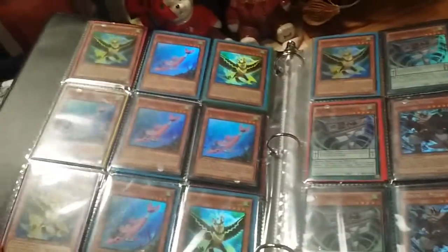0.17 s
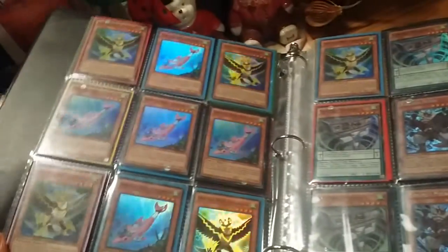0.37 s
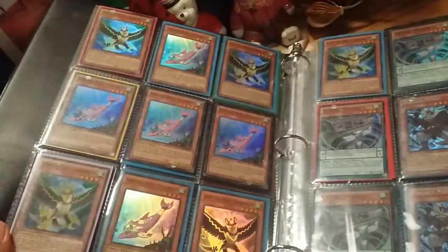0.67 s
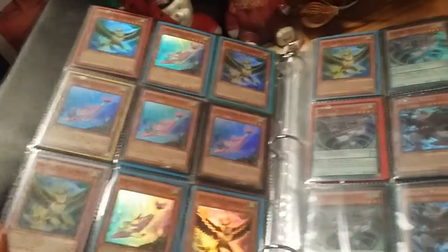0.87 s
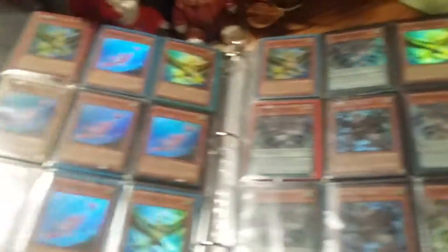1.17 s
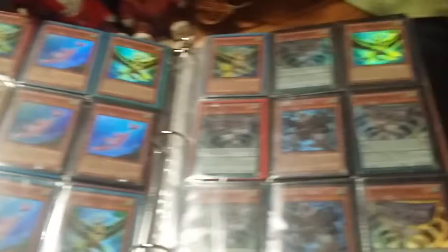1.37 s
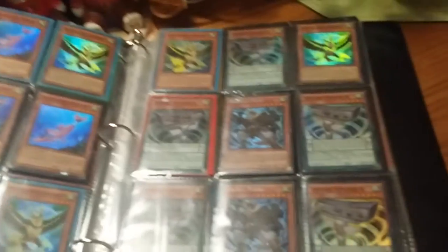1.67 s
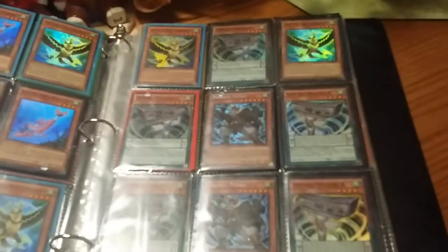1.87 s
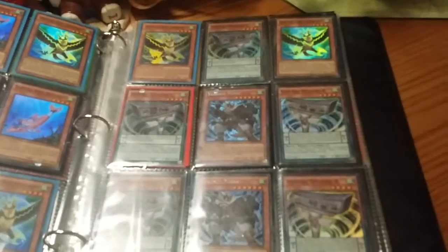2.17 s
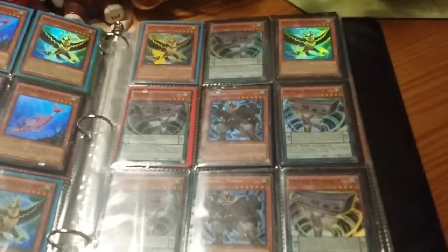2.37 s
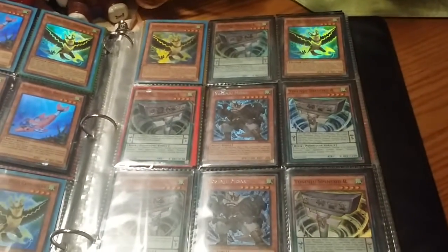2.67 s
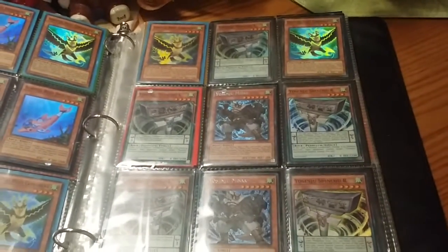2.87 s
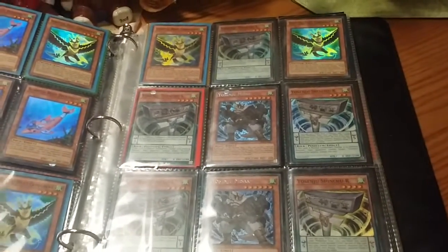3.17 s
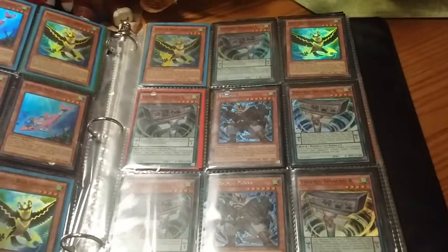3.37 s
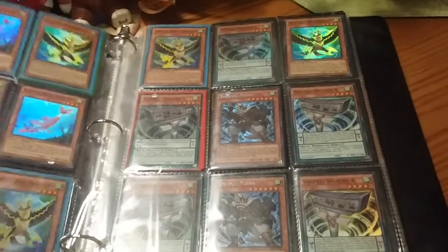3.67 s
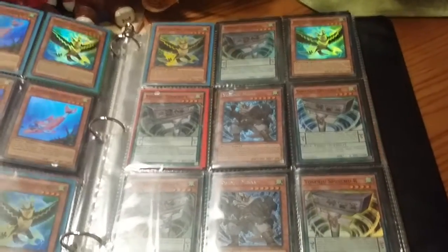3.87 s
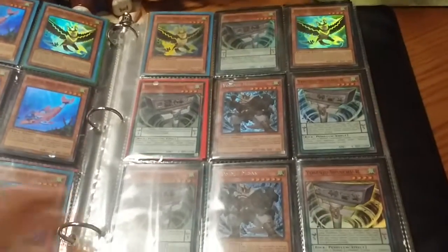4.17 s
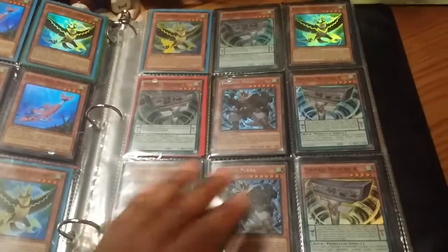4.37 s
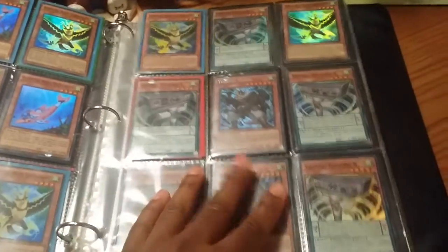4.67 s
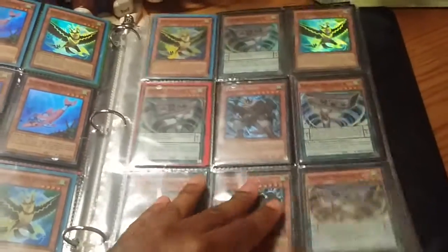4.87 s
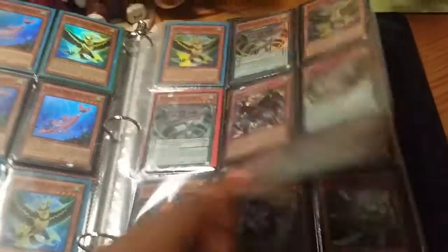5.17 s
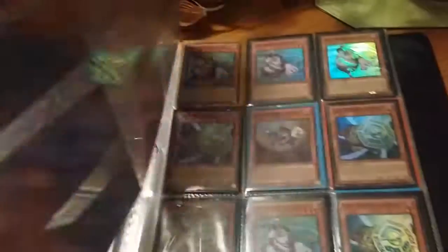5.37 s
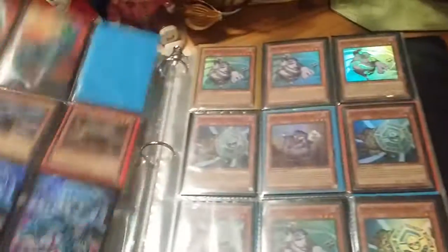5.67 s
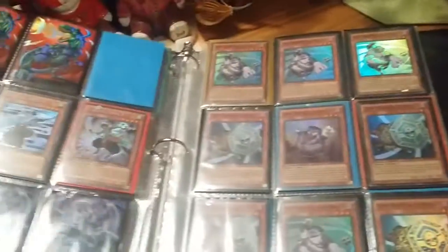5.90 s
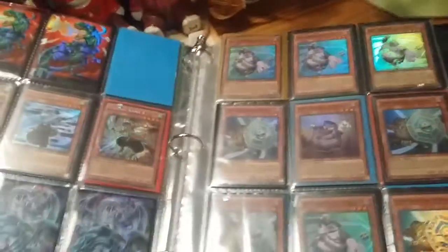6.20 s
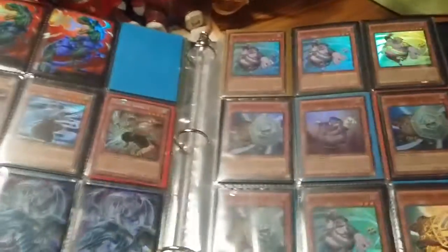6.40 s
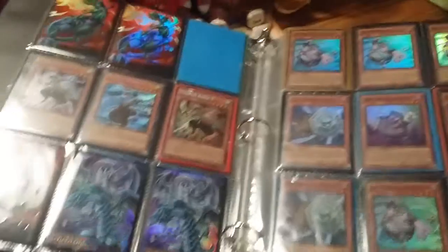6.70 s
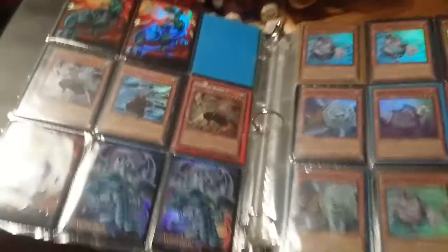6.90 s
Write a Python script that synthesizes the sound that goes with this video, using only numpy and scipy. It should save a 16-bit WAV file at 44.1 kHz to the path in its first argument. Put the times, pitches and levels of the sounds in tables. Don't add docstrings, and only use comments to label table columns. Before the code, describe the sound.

Close to a small microphone in a small, fairly dry room, a low motor hum and soft rushing air run throughout. Plastic pockets of sleeved cards rustle faintly, with dull creaks and soft thuds. Midway come sharper snaps and a ring knock; then the page is pressed, cracks crisply, and turns in a burst of rustle, ticks and low knocks before settling.

```python
import sys
import numpy as np
from scipy import signal
from scipy.fft import rfft, irfft, next_fast_len
from scipy.io import wavfile
from scipy.ndimage import uniform_filter1d, map_coordinates

SR = 44100
rng = np.random.default_rng(int(sys.argv[2]) if len(sys.argv) > 2 else 0)


def magnitude_from_level(level_db):
    exponent = np.asarray(level_db, float) / 20
    return 10 ** exponent


def wav_record(signal):
    frames = np.transpose(np.atleast_2d(signal))
    bounded = np.clip(frames, -1, 1)
    quanta = np.round(bounded * 32767).astype(np.int16)
    wavfile.write(sys.argv[1], SR, quanta)


N = 310464

# (frequency [Hz], level [dB rms])
MOTOR_PAIR = [(58.21, -55.5), (61.76, -57.6)]
HUM_HZ = [119.98, 239.97, 359.94, 479.93, 269.09, 226.89, 210.83, 450.8, 117.19, 389.09, 468.75, 327.36,
          244.93, 53.64]
HUM_DB = [-51, -56, -57, -61.3, -43.1, -54.3, -63, -61.4, -66.4, -68.8, -67.7, -69.7, -67.6, -71]
HUM_SHAKE_DB = [1.2, 1, 1.8, 1.5, .2] + 9 * [1]
HUM_SWAY_DB = [0, 0, 3.5] + 11 * [0]
# (frequency [Hz], level [dB per Hz])
AIR_COLOUR = [(24, -48), (40, -15.5), (55, -7), (81, -13.5), (124, -7.5), (177, -10.5), (245, -8.5),
              (268, -5.5), (294, -11.5), (317, -8), (371, -11), (412, -14.5), (457, -14), (521, -19),
              (593, -18.5), (900, -22), (1170, -64), (1980, -120)]
# (frequency [Hz], level [dB per Hz])
HISS_COLOUR = [(350, -4), (600, 2), (828, -13.5), (862, -15), (934, -3), (1600, -7.5), (1750, -6.5),
               (2120, -14), (3570, -21.5), (5270, -32.5), (13300, -14), (14800, -18.5)]
# (frequency [Hz], time to fall 60 dB [s])
ROOM_DECAY = [(300, 0.24), (2000, 0.084), (10000, 0.091)]

# (time [s], peak level [dB])
RING_KNOCK = [
    (3.7157, -15.8),
]
# (frequency [Hz], level [dB], time to fall 60 dB [s])
COVER_TONES = [(460, -20, 0.11), (477, -9, 0.11), (640, 10.5, 0.034), (600, -4, 0.032), (705, 4.5, 0.032),
               (825, -14, 0.1), (780, 14, 0.0071), (1030, 8, 0.02), (1650, -6, 0.05), (2260, -2.5, 0.023),
               (3515, -25, .02)]
# (time [s], peak level [dB], frequency [Hz], time to fall 60 dB [s])
TABLE_THUDS = [
    (1.301, -31, 62, 0.2),
    (1.3, -26, 255, 0.2),
    (1.819, -32, 56.5, 0.14),
    (3.718, -33, 211, 0.17),
    (5.848, -20.5, 64.6, 0.092),
    (6.328, -31, 122, 0.14),
]

# (peak time [s], level [dB], held [s], stack resonance [Hz])
BENDS = [(0.0, -68, 0.017, 1310), (.12, -61, 0.073, 1330), (.35, -57, 0.18, 1290), (.57, -71, .01, 1290),
         (.68, -64.5, 0.13, 1330), (1.08, -57, .005, 1760), (1.21, -55.5, 0.01, 1230),
         (1.29, -54, 0.049, 1450), (1.56, -58, 0.11, 1410), (1.8, -54.5, 0.1, 1160),
         (2.25, -51.5, 0.052, 1340), (2.34, -64, 0.028, 1360), (2.57, -61, .01, 1310),
         (2.8, -59, 0.086, 1370), (3.6, -67, .06, 1310), (3.75, -52, 0.004, 1120), (3.96, -64, 0.15, 1650),
         (4.22, -65, .005, 1780), (4.45, -58.5, 0.011, 1430), (4.74, -61.5, 0.098, 1770),
         (4.96, -62, 0.11, 1210), (5.23, -55, .005, 1600), (5.33, -57, 0.16, 1610), (5.62, -62, .04, 1240),
         (5.71, -52, .01, 1290), (5.97, -59.5, 0.036, 1320), (6.35, -54.5, .005, 1020),
         (6.5, -60, 0.095, 1460), (6.92, -68, .01, 1130), (7.03, -60, .01, 1030)]
# (peak time [s], crinkle level [dB], held [s], slide level over crinkle [dB])
DRAGS = [(.36, -69, 0.025, 7), (.44, -68, 0.018, -5), (1.05, -59, 0.027, 1), (1.3, -73, 0.11, 8),
         (3.65, -57.5, .015, 1.5), (4.45, -62, 0.014, 1), (4.85, -53, 0.0044, 1.5),
         (5.23, -56.5, 0.039, -4), (5.35, -65, 0.044, 5), (5.64, -56.5, 0.055, -0.5), (5.71, -55, .01, 4),
         (5.8, -58.5, 0.15, 1), (5.98, -58.5, 0.14, -5), (6.44, -58.5, 0.047, -10), (2.82, -61, .02, -3),
         (4.02, -62, .02, 0)]
# (frequency [Hz], level [dB per Hz])
CRINKLE_COLOUR = [(1500, 1.5), (2600, 1), (4000, 0.5), (6000, -4), (8000, -8.5), (11000, -12.5)]
# (frequency [Hz], level [dB per Hz])
SLIDE_COLOUR = [(5000, -53), (8000, -4), (10500, -1), (13000, 0), (15500, -4.5)]

# (time [s], peak level [dB], frequency [Hz], held [s], width [parts of frequency])
CREAKS = [(0.167, -37.5, 605, 0.032, 1.7), (0.285, -42, 1900, 0.03, 0.29), (1.046, -39, 2000, 0.018, 0.47),
          (1.3035, -33, 610, 0.01, 0.5), (1.8, -34, 603, 0.015, 0.83), (2.254, -30.5, 940, 0.018, 0.4),
          (2.329, -36.5, 1220, 0.041, 0.76), (2.541, -43, 1240, 0.025, 0.59),
          (3.536, -40, 1300, 0.012, 1.1), (3.661, -32, 600, 0.0079, 0.38), (3.946, -28, 1710, 0.021, 0.42),
          (4.17, -38.5, 1850, 0.03, 0.44), (4.864, -35, 4170, 0.0057, 0.091),
          (0.388, -44, 4050, 0.033, 0.54), (1.955, -44, 850, 0.038, 0.16), (4.704, -37.5, 735, 0.0095, 1.3),
          (5.214, -38, 617, 0.062, 1.6), (5.663, -41, 705, 0.02, 0.52), (5.686, -32, 615, 0.0071, 0.64),
          (5.693, -43, 1400, 0.028, 0.7)]
# (time [s], peak level [dB], frequency [Hz])
PAGE_THUMPS = [
    (5.401, -34, 630),
    (5.428, -32, 690),
    (5.495, -30.5, 785),
    (5.575, -42, 595),
]
# (time [s], peak level [dB], frequency [Hz], held [s])
RUBS = [(0.167, -50, 1370, 0.015), (1.288, -42.5, 1600, 0.042), (1.334, -45, 1470, 0.051),
        (1.89, -41.5, 1570, 0.04), (2.239, -37, 1560, 0.025), (2.58, -43, 1390, 0.042),
        (2.809, -48.5, 1900, 0.028), (3.607, -43, 1650, 0.022), (3.8035, -41.5, 1820, 0.015),
        (3.9819, -37.5, 1650, 0.044), (4.855, -42, 2400, 0.015), (2.25, -47, 2470, 0.039),
        (5.214, -39, 1880, 0.014), (5.4191, -43, 2050, 0.016), (5.491, -50, 2030, 0.009)]
# (time [s], peak level [dB], frequency [Hz], held [s])
SCUFFS = [(0.385, -49, 2590, 0.029), (1.044, -44.5, 3180, 0.035), (3.66, -40, 3400, 0.006),
          (4.7775, -41, 4360, 0.027), (4.805, -46, 3020, 0.039), (4.846, -38, 3090, 0.013),
          (5.418, -40, 6200, 0.012), (5.2246, -46, 3710, 0.017), (5.4144, -49, 2830, 0.02),
          (6.913, -52, 3100, 0.027)]
# (time [s], peak level [dB], frequency [Hz], held [s])
SWISHES = [(3.5095, -56, 12800, 0.03), (3.763, -35, 12900, 0.011), (4.7905, -38, 13000, 0.013),
           (5.2114, -40, 11900, 0.013), (5.409, -45, 12900, 0.043), (5.6366, -44, 14000, 0.03),
           (5.745, -36, 13800, 0.045), (5.76, -43, 10000, 0.031), (5.83, -46, 13400, 0.05),
           (5.9, -38.5, 13100, 0.026), (5.95, -45, 13300, 0.033), (5.71, -45, 13600, 0.03),
           (6.0551, -48, 11500, 0.031)]

# (centre time [s], peak
# level [dB], frequency [Hz], length [cycles])
POPS = [(4.7753, -40, 1900, 4), (4.7829, -42, 4500, 8), (4.7911, -41, 4600, 6), (4.8534, -35, 2000, 2),
        (4.8677, -41, 2100, 5), (4.8694, -43, 4200, 16), (4.873, -41, 4400, 14), (4.8737, -44, 2200, 5),
        (4.8775, -34, 2200, 6), (4.8799, -29.5, 2030, 4.3), (4.8733, -46, 12800, 14),
        (4.8892, -46, 2300, 5), (5.2056, -41, 900, 2.2), (5.2111, -41, 2000, 4), (5.2305, -44, 2000, 4),
        (5.6846, -36, 700, 2), (5.6908, -33, 1300, 1.8), (5.6976, -43, 12500, 14), (5.7085, -37, 1050, 4),
        (5.7146, -34, 1600, 2.3), (5.7147, -32, 3900, 4.6), (5.7187, -45, 3700, 4), (5.7198, -41, 1050, 3),
        (5.725, -39, 1500, 4), (5.7285, -39, 1200, 3), (3.6622, -33, 900, 2.5), (3.7238, -39, 1400, 3),
        (3.7268, -36, 1200, 3), (3.7295, -32, 750, 4), (3.7662, -33, 1700, 2.5), (3.7734, -43, 2000, 4),
        (3.7777, -41, 600, 2), (3.719, -43, 3300, 2.5), (3.9495, -39, 1750, 6), (4.015, -43, 1500, 6),
        (4.035, -47, 2200, 8), (4.176, -44, 2000, 8), (4.19, -48, 1700, 7), (4.215, -48, 2100, 9),
        (4.234, -47, 1500, 5), (1.303, -43, 1550, 9), (1.329, -45, 1650, 12), (1.312, -39, 260, 2.5),
        (1.345, -37, 270, 2.5),
        (.3972, -55, 7000, 9), (.4034, -55, 7000, 9), (.4107, -50, 4200, 9), (1.0446, -50, 3600, 7),
          (1.0461, -54, 7000, 8), (1.0488, -46, 1900, 6), (1.0621, -45, 2500, 4), (1.0708, -50, 3800, 7),
          (1.0735, -55, 7000, 9), (1.0861, -48, 1800, 5), (3.5371, -51, 7000, 7), (3.5498, -47, 1900, 5),
          (3.6505, -49, 7500, 6), (3.6506, -45, 1800, 3), (3.6617, -34, 9200, 6), (3.6717, -45, 12800, 12),
          (3.7465, -36, 7400, 5), (3.7466, -41, 2000, 3), (3.7569, -48, 3500, 5), (3.7597, -50, 9500, 9),
          (3.7708, -48, 3600, 5), (4.775, -49, 9500, 4), (4.7834, -50, 9700, 9), (4.791, -44, 7300, 7),
          (4.8059, -47, 10300, 12), (4.8465, -45, 4300, 7), (4.8497, -42, 7000, 8), (4.8504, -46, 9300, 9),
          (4.8581, -52, 7000, 8), (4.8616, -49, 7000, 8), (4.8618, -43, 2300, 6), (4.8676, -50, 9800, 9),
          (4.8796, -31, 10200, 11), (4.8803, -40, 13400, 14), (4.8813, -39, 3900, 5), (5.23, -48, 3500, 5),
          (5.4254, -45, 2000, 5), (5.4622, -44, 2800, 2), (5.4655, -42, 1700, 4), (5.4957, -35, 1900, 4),
          (5.4982, -40, 2000, 4), (5.5007, -42, 1900, 4), (5.5755, -44, 1900, 5), (3.5366, -43, 1600, 3),
          (5.5074, -47, 1500, 3), (5.6907, -33, 9000, 6), (5.6955, -49, 9500, 9), (5.7024, -47, 12500, 12)]
# (time [s], crack peak [dB], top edge [dB], ring level [dB], ring frequency [Hz])
SNAPS = [(1.0444, -59, -11, 16, 2050), (1.624, -44, -2, 2, 848), (2.8204, -45, -12, 2, 969),
         (3.51, -50, -1, 8, 1420), (3.526, -47, -11, 12, 2000), (3.5353, -40.5, -12, 4, 1290),
         (3.5515, -47, -7, 4, 1690), (3.649, -37, -22, -7, 1160), (3.6605, -33, -8, 1, 940),
         (3.7652, -30, -7, -10, 1900), (3.8943, -52, -8, -2, 1200), (4.0238, -47, -6, 6, 1270),
         (4.8762, -46, -25, 6, 2130), (4.878, -35, -6, -14, 2040), (5.205, -42, -4, -3, 1980),
         (5.2297, -40, -15, -4, 1460), (5.4605, -45, -22, 8, 1680), (5.4941, -55, -20, 20.5, 2020),
         (5.5765, -57, -12, 10, 1930), (5.683, -42, 0, 3, 920), (5.7132, -32, -17, -6, 1290),
         (6.9121, -37.5, -5.5, -0.5, 1050)]
# (time [s], peak level [dB], top edge [dB])
CRACKS = [(0.6478, -48, -6), (3.7452, -37, -2), (4.4357, -50, -8), (4.7796, -49, -4), (4.79, -44, -4),
          (4.8515, -34, -14), (5.209, -42, -20), (5.6894, -28, -12), (5.989, -50, -2)]
# (time [s], peak level [dB], frequency [Hz])
TICKS = [(4.775, -40, 1900), (4.7824, -36, 4200), (4.79, -37, 4300), (4.791, -40, 13300),
         (4.805, -38, 10800), (4.8105, -38, 7300), (4.815, -45, 4000), (4.8355, -40, 6800),
         (4.845, -35, 4300), (4.8527, -34, 2300), (4.862, -37, 2600), (4.8786, -30, 10400),
         (5.2062, -29, 2060), (5.2064, -38, 12800), (5.2112, -36, 2100), (5.2155, -42, 12500),
         (5.2315, -45, 12000), (5.2355, -42, 3600), (5.42, -33, 2060), (5.4225, -41, 3700),
         (5.4255, -46, 6300), (5.4255, -43, 13000), (5.432, -46, 6800), (5.4663, -39, 1800),
         (5.496, -42, 1900), (5.499, -44, 2000), (5.518, -41, 1900), (5.6368, -43, 3040),
         (5.6908, -37, 1640), (5.709, -29, 1300), (5.722, -38, 1500), (5.73, -38, 1300),
         (5.762, -39, 13000), (5.935, -40, 1670), (3.662, -33, 3500), (3.746, -35, 2000),
         (3.7493, -27, 1900), (1.3065, -36, 696), (3.536, -44, 1500), (3.951, -38, 1700),
         (3.6505, -40, 2480), (4.8, -43, 3500), (4.824, -47, 3000), (4.857, -41, 3200), (4.867, -41, 2400),
         (5.211, -39, 4000), (5.5845, -41, 2000), (5.6925, -38, 3970), (5.7147, -36, 4500),
         (5.933, -41, 12500), (5.8045, -41, 13500), (4.8785, -36, 13500)]

# (frequency [Hz], threshold over usual level [dB])
MUTE_THRESHOLD = [(3500, -32), (5500, -8), (7300, -1.5), (8800, -6.5), (11000, -29), (14500, -16)]


def unit(x):
    return x / np.sqrt(np.mean(x ** 2) + 1e-20)


def along(points, hz):
    f, v = np.transpose(points)
    return np.interp(np.log(hz + 1), np.log(f + 1), v)


def wobble(rate):
    knots = rng.standard_normal(int(N * rate / SR) + 4)
    return map_coordinates(knots, [np.arange(N) * rate / SR])


def coloured(x, spectrum):
    m = next_fast_len(len(x) + 8192)
    gain = magnitude_from_level(along(spectrum, np.fft.rfftfreq(m, 1 / SR)))
    return unit(irfft(rfft(x, m) * gain, m)[:len(x)])


def grains(clump_db, spike_db):
    strength = magnitude_from_level(clump_db * wobble(60) + spike_db * wobble(900))
    return unit(strength * rng.standard_normal(N))


def strokes(s, db, held, rise, fall):
    late = np.arange(0, N + 64, 64) / SR - s[:, None]
    rising_db = rise * np.minimum(late, 0)
    falling_db = fall * np.maximum(late - held[:, None], 0)
    each_db = db[:, None] + rising_db - falling_db
    return np.repeat(np.sqrt(np.sum(magnitude_from_level(2 * each_db), axis=0)), 64)[:N]


def resonate(x, hz, width):
    b, a = signal.iirpeak(hz, 1 / np.clip(width, .05, 3), SR)
    return signal.lfilter(b, a, signal.lfilter(b, a, x))


def band_burst(t, hz, width, t60, rise, held=0):
    steps = np.repeat(rng.standard_normal(len(t) // 60 + 1), 60)[:len(t)]
    grit = magnitude_from_level(2.4 * steps) * rng.standard_normal(len(t))
    noise = unit(resonate(grit, hz, width))
    fade = magnitude_from_level(-60 * np.maximum(t - held, 0) / t60)
    return .5 * noise * fade * (1 - np.exp(-t / rise))


def struck(t, hz, width, scatter_s):
    push = magnitude_from_level(-60 * t / scatter_s) * rng.standard_normal(len(t)) * 0.4
    push[0] = 1
    ring = resonate(push, hz, width)
    return ring / np.abs(ring).max()


def add(track, s, sound):
    track[round(s * SR):][:len(sound)] += sound


def hum():
    t = np.arange(N) / SR
    sway = np.cos(2 * np.pi * 1 * (t - .15))
    tones = np.zeros(N)
    for hz, db, shake_db, sway_db in zip(HUM_HZ, HUM_DB, HUM_SHAKE_DB, HUM_SWAY_DB):
        level = magnitude_from_level(db + shake_db * wobble(3.73) + sway_db * sway)
        tones += level * np.sin(2 * np.pi * (hz * t + rng.random()))
    pair = np.zeros(N)
    null_s = 1.682
    for k, (hz, db) in enumerate(MOTOR_PAIR):
        rocking = (1 - k) * .6 * sway
        pair += (-1) ** k * magnitude_from_level(db) * np.sin(2 * np.pi * hz * (t - null_s) + rocking)
    air = magnitude_from_level(-49.5 + .7 * wobble(3)) * coloured(rng.standard_normal(N), AIR_COLOUR)
    hiss = magnitude_from_level(-56.0 + 0.12 * wobble(2.1)) * coloured(rng.standard_normal(N), HISS_COLOUR)
    return np.sqrt(2) * (tones * (1 + .11 * sway) + pair) + air + hiss


def room(x):
    hz, t, z = signal.stft(rng.standard_normal(SR // 2), SR, nperseg=256)
    fade = magnitude_from_level(-60 * t / along(ROOM_DECAY, hz)[:, None])
    tail = signal.istft(z * fade, SR, nperseg=256)[1]
    return signal.fftconvolve(np.pad(x, (200, 0)), tail / np.linalg.norm(tail))[:N]


def knocks():
    out, t = np.zeros(N + SR), np.arange(SR // 2) / SR
    for s, db in RING_KNOCK:
        ring = np.zeros(len(t))
        for hz, level, t60 in COVER_TONES:
            ring += magnitude_from_level(level - 60 * t / t60) * np.sin(2 * np.pi * hz * t)
        ring *= 1 - np.exp(-t / 0.00042)
        blow = struck(t, 2300, width=1.6, scatter_s=0.003)
        contact = np.hanning(10) / 5
        add(out, s + 0.00255, np.convolve(magnitude_from_level(db - 14.5) * ring + magnitude_from_level(db - 9.0) * blow, contact))
    for s, db, hz, t60 in TABLE_THUDS:
        add(out, s, magnitude_from_level(db - 1.5) * band_burst(t, hz, width=0.27, t60=t60, rise=0.004))
    return out[:N]


def rubs_and_creaks():
    out, t = np.zeros(N + SR), np.arange(SR // 4) / SR

    def rub(s, db, hz, held, width, t60, rise):
        burst = band_burst(t, hz, width=width, t60=t60 + 3.7 * held, rise=rise, held=held)
        add(out, s, magnitude_from_level(db - 7.5) * burst)

    for s, db, hz, held, width in CREAKS:
        rub(s, db, hz, held, width, t60=0.038, rise=0.00062)
    for s, db, hz in PAGE_THUMPS:
        rub(s, db, hz, held=0.0034, width=0.7, t60=0.026, rise=0.00053)
    for s, db, hz, held in RUBS:
        rub(s, db, hz, held, width=0.66, t60=0.04, rise=0.00062)
    for s, db, hz, held in SCUFFS:
        rub(s, db, hz, held, width=0.66, t60=0.03, rise=0.00062)
    for s, db, hz, held in SWISHES:
        rub(s, db, hz, held, width=0.38, t60=0.017, rise=0.0031)
    return out[:N]


def pops():
    out, t = np.zeros(N + SR), np.arange(-SR // 50, SR // 50) / SR
    for s, db, hz, cycles in POPS:
        swell = np.exp(-(2 * t * hz / cycles) ** 2 * 2)
        add(out, s + t[0], magnitude_from_level(db) * swell * np.cos(2 * np.pi * hz * t))
    return out[:N]


def snaps():
    out, t = np.zeros(N + SR), np.arange(SR // 4) / SR
    dry_cracks = [(s, db, edge_db, -12, 1040) for s, db, edge_db in CRACKS]
    for s, db, edge_db, ring_db, hz in SNAPS + dry_cracks:
        crack = struck(t, 3900, width=1.1, scatter_s=0.0035)
        edge = struck(t, 12800, width=.4, scatter_s=.005)
        after_slips_s = 0.026 * magnitude_from_level(0.32 * (db + 34))
        ring = struck(t, hz, width=0.54, scatter_s=after_slips_s)
        snap = crack + magnitude_from_level(edge_db + 9.5) * edge + magnitude_from_level(ring_db - 3.0) * ring
        add(out, s + .0011, magnitude_from_level(db + 1.0) * snap)
    for s, db, hz in TICKS:
        add(out, s - .0005, magnitude_from_level(db - 2.0) * struck(t, hz, width=0.5, scatter_s=0.004))
    return out[:N]


def rustle():
    def moving(stroke, rest_db):
        return np.hypot(stroke, magnitude_from_level(rest_db + 1.3 * wobble(10)))

    s, flex_db, held, centre_hz = np.transpose(BENDS)
    hz, t, z = signal.stft(grains(clump_db=1.5, spike_db=-1), SR, nperseg=512)
    octaves = np.log2((hz[:, None] + 1) / np.interp(t, s, centre_hz))
    shape = magnitude_from_level(-4 * np.abs(octaves) - 4.4 * octaves ** 2)
    shape = shape / np.sqrt(np.mean(shape ** 2, axis=0))
    flex = unit(signal.istft(z * shape, SR, nperseg=512)[1][:N])
    bent = strokes(s, flex_db, held, rise=178, fall=114)

    crinkle = coloured(grains(clump_db=1.0, spike_db=0.5), CRINKLE_COLOUR)
    slide = coloured(grains(clump_db=3.0, spike_db=-1.0), SLIDE_COLOUR)
    s, crinkle_db, held, slide_db = np.transpose(DRAGS)
    crinkled = strokes(s, crinkle_db, held, rise=198, fall=195)
    slid = strokes(s, crinkle_db + slide_db, held, rise=198, fall=195)
    return moving(bent, -67.5) * flex + moving(crinkled, -61.5) * crinkle + moving(slid, -67.5) * slide


def port_dip(x):
    octaves = np.log2((np.fft.rfftfreq(N, 1 / SR) + 1) / 8200)
    return irfft(rfft(x) * magnitude_from_level(-2.5 * np.exp(-(octaves / 0.15) ** 2)), N)


def scene():
    steady = hum() + rustle()
    hits = port_dip(knocks() + rubs_and_creaks() + pops() + snaps())
    return (hits + magnitude_from_level(-8.5) * room(hits) + steady)[None]


def mute_weak_treble(x):
    size, start, band = 1024, 946, 8
    n, k = np.arange(2 * size), np.arange(size)
    basis = np.cos(np.pi / size * np.outer(n + .5 + size / 2, k + .5)) * np.sqrt(2 / size)
    basis *= signal.windows.kaiser_bessel_derived(2 * size, 4 * np.pi)[:, None]
    padded = np.pad(x, (2 * size - start, 3 * size))
    at = np.arange(0, len(padded) - 2 * size, size)[:, None] + n
    lines = padded[at] @ basis

    level_db = 10 * np.log10(np.mean(lines.reshape(len(at), -1, band) ** 2, axis=2) + 1e-20)
    loud_db = 10 * np.log10(np.mean(lines[:, 24:140] ** 2, axis=1, keepdims=True) + 1e-20)
    hz = (np.arange(size // band) + .5) * band * SR / 2 / size
    usual_db = np.median(level_db, axis=0)
    nearby_db = uniform_filter1d(level_db - usual_db, size=9, axis=1)
    limit_db = usual_db + 0.4 * nearby_db + along(MUTE_THRESHOLD, hz)
    limit_db = limit_db + 0.49 * (loud_db - np.median(loud_db))
    chance = unit(uniform_filter1d(rng.standard_normal(level_db.shape), size=2, axis=0))
    kept = (level_db > limit_db + 5.5 * chance) | (hz < MUTE_THRESHOLD[0][0])

    frames = (lines * np.repeat(kept, band, axis=1)) @ basis.T
    return np.bincount(at.ravel(), frames.ravel())[2 * size - start:][:N]


def roll_off(x):
    return signal.sosfilt(signal.butter(12, 15430, fs=SR, output="sos"), x)


def record(dry):
    hz = np.fft.rfftfreq(N, 1 / SR)
    passed = (hz < 14540) / np.sqrt(1 + (45 / (hz + 1)) ** 8)
    heard = mute_weak_treble(irfft(rfft(dry[0]) * passed, N))
    return roll_off(heard[None])


dry = scene()
out = record(dry)
wav_record(out)
```